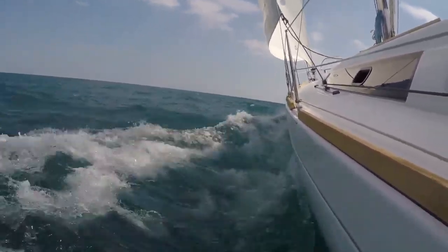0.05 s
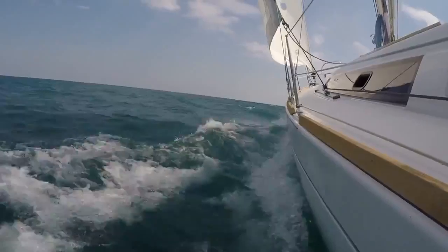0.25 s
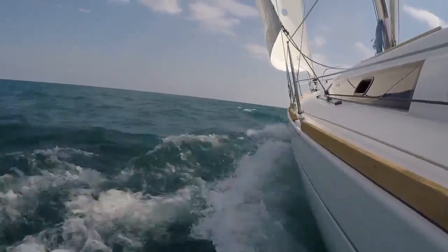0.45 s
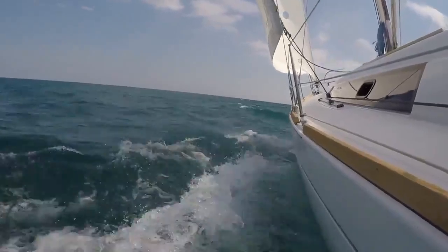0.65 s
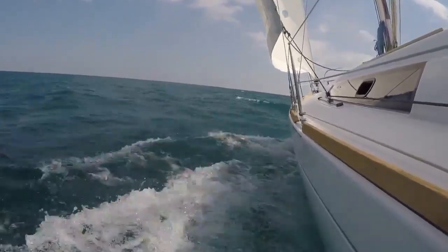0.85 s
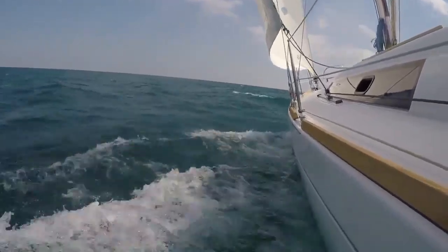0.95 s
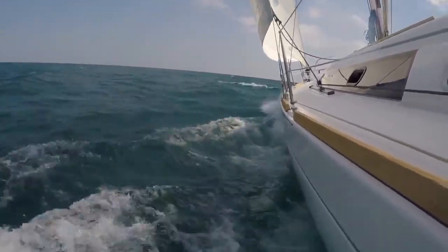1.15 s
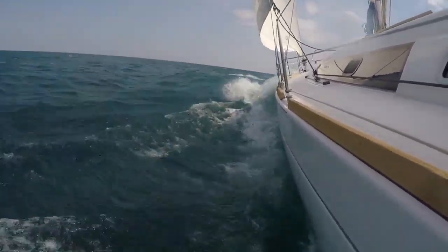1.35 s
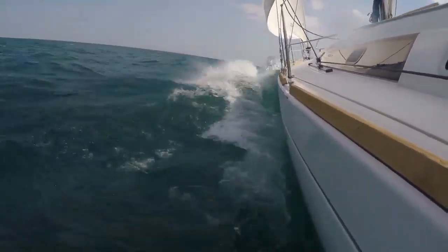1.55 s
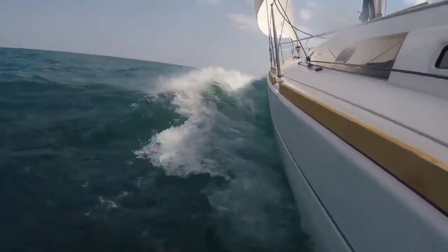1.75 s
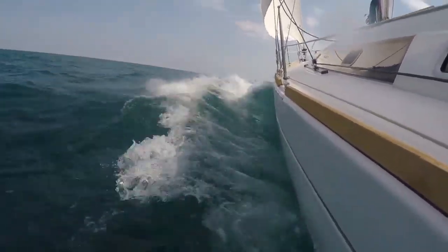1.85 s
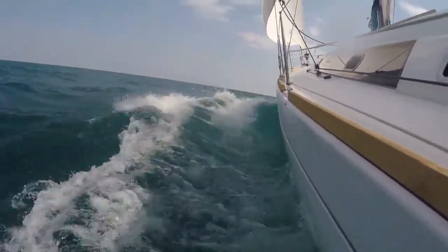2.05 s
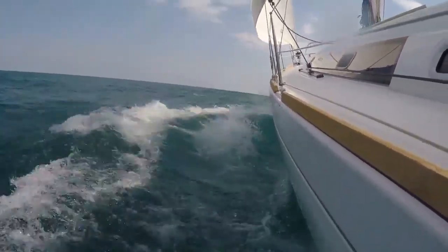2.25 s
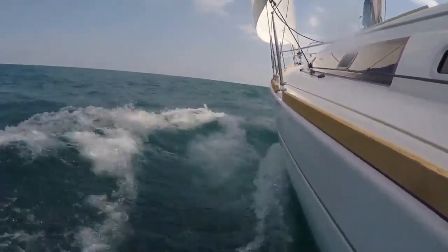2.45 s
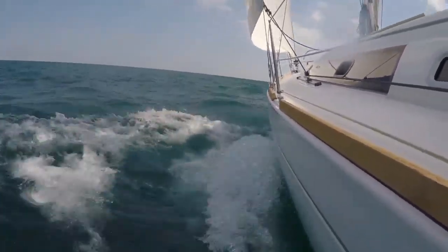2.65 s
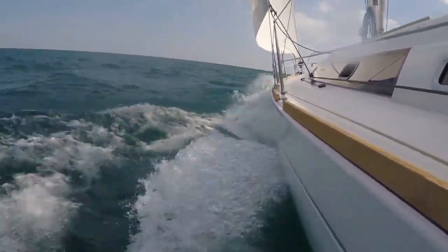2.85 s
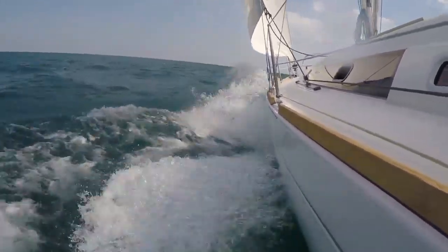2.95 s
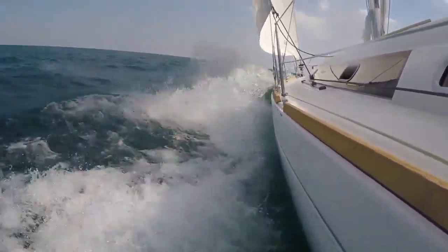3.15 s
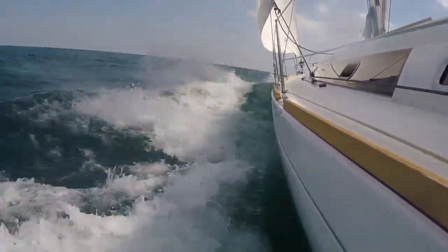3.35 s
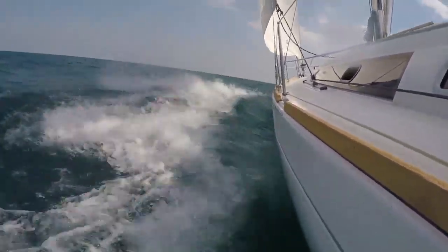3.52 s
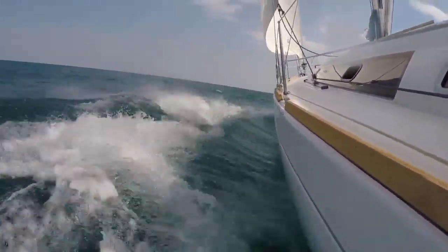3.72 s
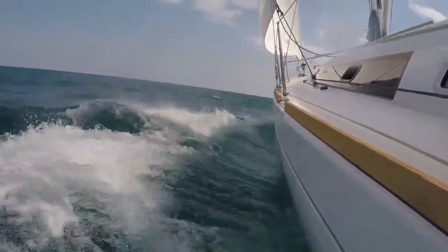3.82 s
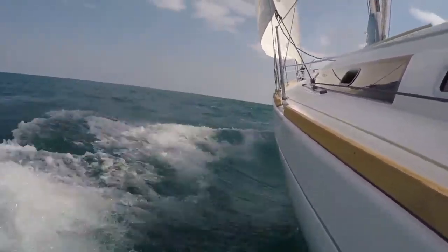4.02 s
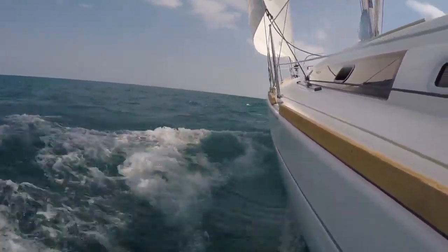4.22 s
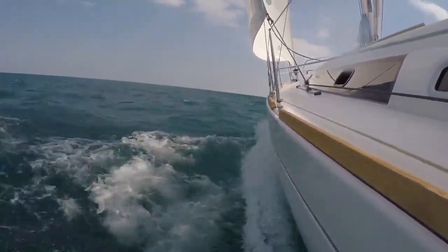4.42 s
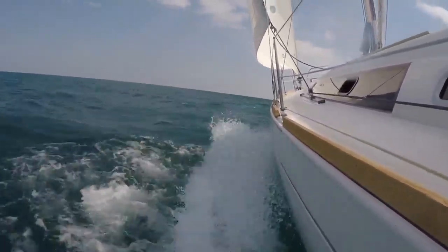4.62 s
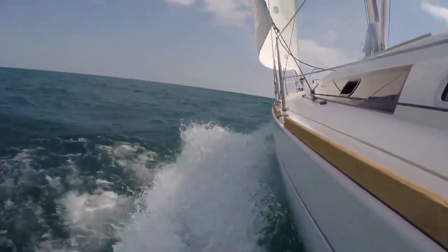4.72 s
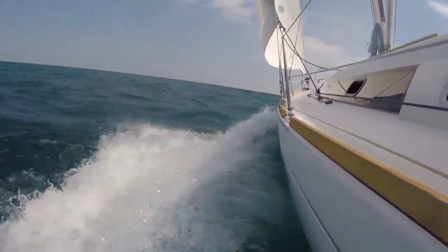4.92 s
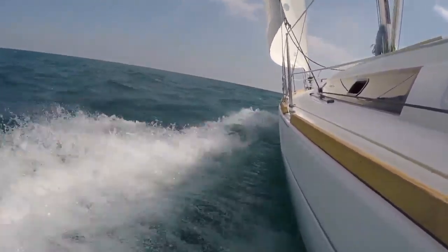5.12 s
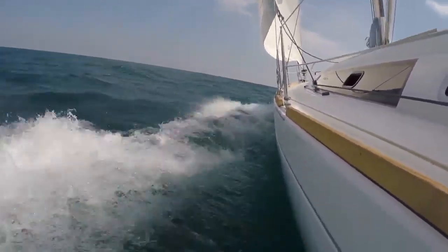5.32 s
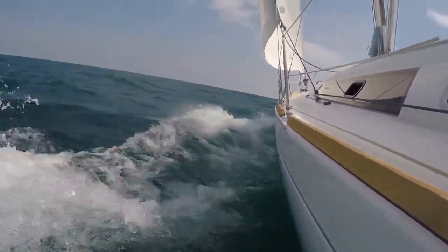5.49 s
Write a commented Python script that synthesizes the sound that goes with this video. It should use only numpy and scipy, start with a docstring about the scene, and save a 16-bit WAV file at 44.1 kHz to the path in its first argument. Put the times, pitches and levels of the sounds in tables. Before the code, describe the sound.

Close beside a sailing boat's hull in choppy sea, foamy water rushes continuously, surging as bow waves break, strongest around three and five seconds. Low wind rumble and fluttering buffets dominate the microphone, roughest in the first second. Drops tick and knock on its case, lumps of water slap, and one tiny squeak passes early. The sound is boxy and muffled, outdoors without echo.

```python
"""Water rushes along the hull of a sailing boat in a choppy sea, heard from inside a case held out over the rail.
Filtered noise and ringing bubbles make foam, heavy water and spray, which swell as waves break from the bow.
Wind rumbles and buffets the case: shaped noise driven by gusts, with a low boom and a drone.
Drops of spray tick on the case and knock its wall, lumps of water slap down (short noise bursts),
and a fitting squeaks once (a gliding tone)."""
import sys
import numpy as np
from scipy import signal
from scipy.fft import rfft, irfft
from scipy.io import wavfile
from scipy.ndimage import uniform_filter1d

SR = 44100
rng = np.random.default_rng(int(sys.argv[2]) if len(sys.argv) > 2 else 0)


def dump_mix(stems):
    """Bounce the given channels to the path in sys.argv[1] as a 16-bit WAV at rate SR."""
    frames = np.atleast_2d(stems).T  # one column per channel
    limited = np.clip(frames, -1, 1)  # hard clip at full scale
    pcm = np.round(limited * 32767).astype(np.int16)
    wavfile.write(sys.argv[1], SR, pcm)


N = 338247
TIME = np.arange(N) / SR


def amp(db):
    """Decibels to gain."""
    return 10 ** (np.asarray(db) / 20)


def unit(x):
    """Scales to rms 1."""
    return x / np.sqrt(np.mean(x ** 2) + 1e-20)


def wander(rate_hz):
    """Smooth random motion of rms 1, fading out above a given rate."""
    hz = np.fft.rfftfreq(N, 1 / SR)
    return unit(irfft(rfft(rng.standard_normal(N)) * np.exp(-(hz / rate_hz) ** 2), N))


def swell(crest_s, rise_s, fall_s, shape):
    """A gain that builds up to 1 at the crest and runs out after it; shape 1 is pointed, 2 is round."""
    t = TIME - crest_s
    return np.exp(-abs(t / np.where(t < 0, rise_s, fall_s)) ** shape)


def colour(x, points, cased=False):
    """Filters x along a frequency curve, adding the resonances of the case if it is heard through it."""
    # Dips and resonances of the case. Each row: centre in Hz, width in Hz, gain in dB.
    case_modes = [(837, 70, -4.5), (1369, 102, -12.5), (2084, 163, -4.5), (3010, 45, 7.5)]
    hz = np.fft.rfftfreq(N, 1 / SR)
    point_hz, point_db = np.transpose(points)
    shape_db = np.interp(np.log(hz + 1), np.log(point_hz + 1), point_db)
    if cased:
        for centre, width, gain_db in case_modes:
            shape_db = shape_db + gain_db * np.exp(-((hz - centre) / width) ** 2)
    return unit(irfft(rfft(x) * amp(shape_db), N))


def steadied(x, hold_s):
    """Evens out the strength of turbulence, ready to be driven by the gusts."""
    window = signal.windows.hann(max(int(hold_s * SR), 9))
    power = signal.oaconvolve(abs(signal.hilbert(x)) ** 2, window / window.sum(), "same")
    return unit(x / np.sqrt(abs(power) + 1e-6))


def eddies(spectrum, hold_s):
    """Turbulent pressure of even strength: shaped noise with its slow level swings flattened."""
    return steadied(colour(rng.standard_normal(N), spectrum), hold_s)


def boom(hz, width_hz):
    """Turbulence ringing in one low resonance: a tone whose two quadratures wander at random."""
    phase = 2 * np.pi * hz * TIME
    return wander(width_hz) * np.cos(phase) + wander(width_hz) * np.sin(phase)


def wind():
    """Large eddies rumble; small ones flutter against the case in gusts and make it boom."""
    # Wind pressure over time. Each row: time in seconds, rumble level in dB before the trim.
    pressure_curve = [(0, -26), (.18, -22.5), (.28, -15), (.39, -20.5), (.62, -15), (.71, -27), (.82, -21),
                      (1.2, -22), (1.5, -28.5), (1.8, -23.5), (2.0, -28.5), (2.44, -20.5), (2.6, -25.5),
                      (2.78, -22.5), (3.02, -30), (3.12, -21), (3.52, -20), (3.75, -24.5), (4.42, -27.5),
                      (4.6, -21), (4.85, -19.5), (4.92, -14.5), (4.99, -24.5), (5.08, -19), (5.32, -23.5),
                      (5.58, -20), (5.98, -22.5), (6.11, -29.5), (6.27, -23), (6.62, -24), (6.73, -17.5),
                      (6.93, -19.5), (7.04, -24.5), (7.22, -21.5), (7.67, -25.5)]
    # Slow pressure swings of the wind. Each row: frequency in Hz, relative density in dB per Hz.
    rumble_spectrum = [(5, -23.5), (13, 1), (28, -6.5), (34, 2.5), (47, 3), (54, -10.5), (63, -15.5),
                       (76, -21.5), (90, -30.5), (160, -38), (400, -83.5)]
    # Small eddies breaking on the case. Each row: frequency in Hz, relative density in dB per Hz.
    buffet_spectrum = [(35, -4.5), (70, 0), (95, 4.5), (120, 2), (150, -7.5), (205, -8), (305, -8.5),
                       (400, -21.5), (560, -29.5), (1500, -69)]
    # Gusts striking the case. Each row: crest in seconds, buffeting level in dB,
    # length in seconds, low thump in dB over the buffeting.
    gust_rows = [(0.059, -35, 0.091, -7), (0.239, -34, 0.046, -14), (0.301, -25.5, 0.087, -6),
                 (0.352, -29.5, .07, 1.5), (.47, -31, 0.12, -10), (0.575, -30, 0.11, -2),
                 (0.668, -35, 0.075, -18), (0.8, -38.5, 0.12, -10), (0.89, -33.5, 0.12, -4),
                 (1.065, -33, 0.092, -2), (1.432, -31, 0.095, -0.5), (1.577, -35.5, 0.11, -1),
                 (1.754, -41.5, .07, -10), (1.879, -34, 0.086, -13), (2.053, -39.5, 0.13, -17),
                 (2.172, -39, 0.087, 5), (2.68, -42.5, 0.19, -7), (3.223, -37, 0.17, -22),
                 (3.75, -42, 0.16, -11), (4.648, -34, 0.15, -4.5), (4.764, -39, 0.18, -1),
                 (5.1, -42.5, 0.8, -7.5), (6.2, -38.5, 0.09, -21), (6.269, -38, .05, -12),
                 (6.46, -42, .08, -7), (6.794, -44, 0.08, -9), (7.22, -37, 0.11, -8),
                 (7.33, -41, .12, -2.5), (7.643, -41, 0.065, -7)]
    rumble_trim_db, lumps_db, lumps_hz = 1.28, 1.38, 12  # the lumps are random swings of the rumble
    breeze_db = -49.5  # buffeting between the gusts
    gust_rumble_db = 2.5  # the large eddy that each gust brings along, over its buffeting
    thump_hz, thump_width_hz = 118.1, 14  # a head-on gust makes the case boom
    drone_hz, drone_width_hz, drone_db = 73.4, 10.4, -46  # stays through the lulls

    gusts, thumps = 0, 0
    for crest_s, db, length_s, thump_db in gust_rows:
        gust = amp(db) * swell(crest_s, length_s / 2, length_s / 2, shape=1.34)
        # overlapping gusts add in power
        gusts = np.hypot(gusts, gust)
        thumps = np.hypot(thumps, amp(thump_db) * gust)

    wind_db = np.interp(TIME, *np.transpose(pressure_curve))
    pressure = amp(wind_db + rumble_trim_db + lumps_db * wander(lumps_hz))
    rumble = np.hypot(pressure, amp(gust_rumble_db) * gusts) * eddies(rumble_spectrum, hold_s=0.2)
    flutter = unit(eddies(buffet_spectrum, hold_s=0.043) * amp(2 * wander(71)))
    buffet = np.hypot(amp(breeze_db), gusts) * flutter
    thump = thumps * steadied(boom(thump_hz, thump_width_hz), hold_s=0.07)
    drone = amp(drone_db) * boom(drone_hz, drone_width_hz)
    return rumble + buffet + thump + drone


def squeak():
    """A fitting slips once under load: a brief stick-slip tone and weak octave, gliding down as it fades."""
    start_s, length_s, edge_s = 2.396, 0.043, 0.0083
    start_hz, sag_hz_per_s = 3675, 4500
    start_db, fade_db_per_s = -34, 280
    t = np.clip(TIME - start_s, 0, length_s)
    hz = (start_hz - sag_hz_per_s * t) * (1 + .004 * wander(300))  # the pitch trembles slightly
    phase = 2 * np.pi * np.cumsum(hz) / SR
    gate = np.minimum(np.minimum(t, length_s - t) / edge_s, 1)
    tone = np.sin(phase) + amp(-26) * np.sin(2 * phase)
    return gate * amp(start_db - fade_db_per_s * t) * tone


def burst(s, db, hz, octaves, t60):
    """A sudden blow of water: band-passed noise that dies away around one pitch."""
    t = np.arange(SR // 4) / SR
    edges_hz = np.clip(hz * 2. ** np.array([-octaves, octaves]), 50, SR / 2 - 100)
    rise = 1 - np.exp(-t / (0.085 * t60))  # a longer burst also starts more slowly
    fade = rise * amp(-60 * t / t60)
    band = signal.butter(2, edges_hz, "bandpass", fs=SR, output="sos")
    ring = signal.sosfilt(band, rng.standard_normal(len(t)) * fade)
    ring *= amp(db) * np.linalg.norm(fade) / np.linalg.norm(ring)  # the level scales the fade, not its tail
    return np.pad(ring, (round(s * SR), N))[:N]


def knock(s, db):
    """A drop bursts on the wall of the case with a snap, and the wall rings briefly in its modes."""
    # Ringing of the case wall. Each row: frequency in Hz, relative level in dB, 60 dB decay in seconds.
    wall_modes = [(603, -6, 0.022), (1120, -5, 0.019), (1810, -2, .024), (2770, -3.5, 0.016),
                  (3690, -0.5, 0.018), (4670, -9, .025), (5350, -12, 0.0076), (6410, -4.5, 0.015),
                  (7740, -11, 0.017)]
    rise_s = 0.00086
    splat_s, splat_edge_hz = 0.0045, 2300  # the drop bursts flat: a broad snap
    t = np.arange(SR // 10) / SR
    ring = 0
    for hz, mode_db, t60 in wall_modes:
        ring = ring + amp(mode_db - 60 * t / t60) * np.sin(2 * np.pi * (hz * t + rng.random()))
    low_pass = signal.butter(1, splat_edge_hz, fs=SR)
    snap = unit(signal.lfilter(*low_pass, rng.standard_normal(len(t))))
    snap *= 0.5 * amp(-1.5) * np.exp(-(t / splat_s) ** 2)
    blow = amp(db) * (1 - np.exp(-t / rise_s)) * (ring + snap)
    return np.pad(blow, (round(s * SR), N))[:N]


def drops():
    """Each drop ticks brightly and knocks the wall of the case, strongly if it is a heavy one."""
    # Drops on the case. Each row: start in seconds, level in dB, ring in Hz, spread to each side in octaves,
    # 60 dB decay in seconds, knock of the case in dB over the tick.
    drop_rows = [(.446, -47, 9500, .7, .009, -20), (1.3155, -50, 8800, .25, .016, -20),
                 (1.473, -47, 6800, .07, .02, -20), (1.5111, -46, 5000, .7, .015, -15),
                 (1.5875, -28.5, 4670, 0.49, .016, 1), (2.074, -40, 5850, .27, .015, -15),
                 (3.628, -29, 5200, 0.38, 0.03, -9), (5.5433, -29, 4630, .45, 0.019, -1),
                 (5.6804, -20.5, 3130, 0.16, 0.0074, -16.5), (6.0123, -37, 3860, .12, .027, -20),
                 (6.2706, -35, 3560, .08, .014, -20), (6.6918, -42, 5000, 0.48, .012, -5)]
    out = np.zeros(N)
    for s, db, hz, octaves, t60, knock_db in drop_rows:
        out += burst(s, db, hz, octaves, t60) + knock(s, db + knock_db)
    return out


def slaps():
    """Lumps of water slap down, each a longer and mostly lower burst than a drop; the low burst at 5.545 s is
    instead the case thudding under the heavy drop just before it."""
    # Slapping lumps, and at 5.545 s the low thud of the heavy drop on the case. Each row: start in seconds,
    # level in dB, centre in Hz, # spread to each side in octaves, 60 dB decay in seconds.
    slap_rows = [(.757, -41, 3000, 0.31, .11), (2.718, -40, 1900, 0.53, .095),
                 (2.964, -32, 1750, .2, 0.063), (3.011, -31, 1050, .25, .06), (3.106, -35, 1190, 0.14, .12),
                 (3.128, -33, 1800, 0.97, .12), (3.555, -38, 750, 0.2, .09),
                 (4.516, -36.5, 1020, 0.22, 0.065), (4.903, -34, 1090, .2, .16),
                 (5.047, -28.5, 1150, .4, 0.11), (5.052, -29.5, 2990, .3, .1),
                 (5.345, -35, 1740, 0.071, .097), (5.545, -36, 620, .23, 0.035),
                 (5.935, -40, 2800, .51, .26), (6.293, -38, 3300, .34, .077)]
    return sum(burst(*row) for row in slap_rows)


def churn(patch_db, flicker_db):
    """Noise of countless bubbles, in short patches of time and pitch that come and go."""
    z = signal.stft(rng.standard_normal(N), nperseg=512, noverlap=384)[2]
    patches = uniform_filter1d(rng.standard_normal(z.shape), size=9, axis=0)  # smooth over pitch
    patches = unit(uniform_filter1d(patches, size=14, axis=1))  # smooth over time
    x = signal.istft(z * amp(patch_db * patches), nperseg=512, noverlap=384)[1][:N]
    return unit(x * amp(flicker_db * wander(36)))


def bubbles(low_hz, high_hz, per_s, cycles, spread_db, count=28):
    """Single bubbles near by: each rings a few cycles and rises a little in pitch."""
    out = np.zeros(N)
    for hz in np.geomspace(low_hz, high_hz, count):
        age = np.arange(int(5 * cycles / hz * SR)) / SR * hz / cycles  # in decay times
        ring = np.sin(2 * np.pi * cycles * age * (1 + 0.018 * age)) * np.exp(-age)
        chance, size = rng.random((2, N // 16))  # one chance of a bubble every 16 samples
        at = np.flatnonzero(chance < per_s / count * N / SR / len(chance))
        clicks = np.zeros(N)
        clicks[at * 16] = amp(spread_db * np.minimum(-np.log(size[at] + 1e-9), 4))  # few are loud
        out += hz * signal.oaconvolve(clicks, ring)[:N]
    return unit(out)


def surges():
    """Strength of rush, falling water and spray: each wave adds its power to the steady wake."""
    # Waves breaking from the bow. Each row: crest in seconds, rush level in dB, build-up in seconds,
    # run-out in seconds, spray in dB over the rush, falling water in dB over the rush.
    wave_rows = [(.17, -49.5, 0.34, 0.59, -20, -12), (.47, -43, 0.091, 0.11, -7.5, -9),
                 (.82, -47.5, 0.17, 0.33, -7, -7), (2.3, -51, 0.48, 0.83, -25, -14),
                 (3.13, -38, 0.22, 0.088, -7, -10.5), (3.38, -41, 0.29, 0.23, -4, -12),
                 (3.6, -44.5, 0.096, 0.089, -2.5, -11), (3.92, -46, 0.19, 0.22, -9, -11),
                 (4.6, -46.5, 0.31, 0.16, -9, -12), (4.9, -41, 0.23, 0.2, -4, -12),
                 (5.06, -41, 0.11, 0.17, -5.5, -2.5), (5.23, -41, 0.084, 0.28, -8, -8.5),
                 (5.59, -45.5, 0.24, 0.2, -8.5, -13), (7.28, -51.5, 0.16, 0.65, -14, -7)]
    wake_rush_db, wake_pour_db, wake_hiss_db = -48, -61, -55.5  # the steady wake between waves
    spray_lead_s, pour_lag_s = 0.0084, 0.01  # spray flies ahead of the crest, heavy water lands after it
    shape = 1.41
    rush, pour, hiss = amp([wake_rush_db, wake_pour_db, wake_hiss_db]) ** 2
    for s, db, rise_s, fall_s, spray_db, pour_db in wave_rows:
        rush = rush + (amp(db) * swell(s, rise_s, fall_s, shape)) ** 2
        pour = pour + (amp(db + pour_db) * swell(s + pour_lag_s, rise_s, fall_s, shape)) ** 2
        hiss = hiss + (amp(db + spray_db) * swell(s - spray_lead_s, rise_s, fall_s, shape)) ** 2
    return np.sqrt([rush, pour, hiss])


def water():
    """Foam rushes, heavy water pours and gurgles, and spray fizzes above both."""
    # Steady rush of foam. Each row: frequency in Hz, relative density in dB per Hz.
    rush_spectrum = [(200, -40), (500, -14), (1130, -4.5), (1780, -2.5), (2350, -7), (2750, -15),
                     (3700, -12.5), (4300, -21), (7000, -30), (15000, -40.5)]
    # Water falling back into the sea. Each row: frequency in Hz, relative density in dB per Hz.
    pour_spectrum = [(80, -21), (200, 3), (400, 2.5), (720, 0), (1100, -4.5), (2200, -23), (5000, -49)]
    # Hiss of spray and bursting foam. Each row: frequency in Hz, relative density in dB per Hz.
    hiss_spectrum = [(1200, -3), (2500, -6.5), (3600, 2), (4250, -4.5), (5000, -2), (6000, -11),
                     (7000, -7.5), (8000, -20), (9500, -18), (11000, -25.5), (14300, -32), (15500, -50)]
    rush_gain, pour_gain, hiss_gain = surges()

    rush = churn(patch_db=0.7, flicker_db=0.37)
    rush += amp(-8.5) * bubbles(713.0, 4472, per_s=700, cycles=11.9, spread_db=3.5)
    pour = churn(patch_db=3.0, flicker_db=2)
    pour += amp(-7.5) * bubbles(350.4, 1303, per_s=140, cycles=9, spread_db=3)
    hiss = churn(patch_db=1.5, flicker_db=.5)
    hiss += amp(-10.5) * bubbles(2435, 13770, per_s=1400, cycles=11.0, spread_db=6.0)

    slosh = amp(0.5 * wander(22))  # each slosh lifts all three together
    return slosh * (rush_gain * colour(rush, rush_spectrum, cased=True)
                    + pour_gain * colour(pour, pour_spectrum, cased=True)
                    + hiss_gain * colour(hiss, hiss_spectrum))


def scene():
    """Wind, the small sounds on board and the sea, in one channel."""
    return (wind() + squeak() + drops() + slaps() + water())[None]


def record(dry):
    """A steep low-pass removes the very top of the treble."""
    low_pass = signal.firwin(511, 15350, window=("kaiser", 9), fs=SR)  # edge in Hz
    return signal.oaconvolve(dry, low_pass[None], "same")


dry = scene()
out = record(dry)
dump_mix(out)
```